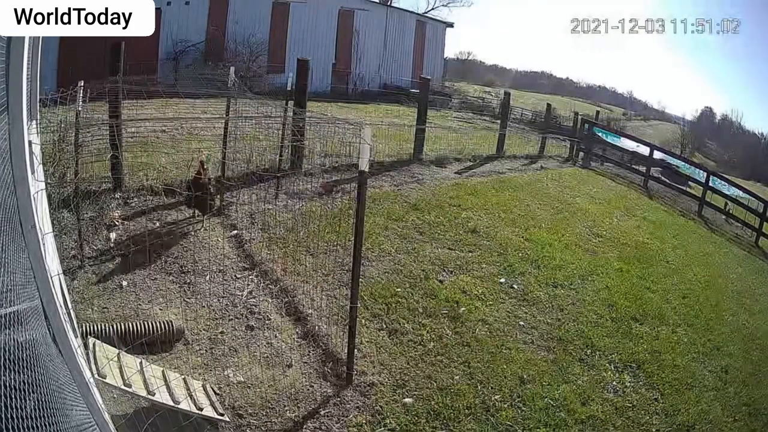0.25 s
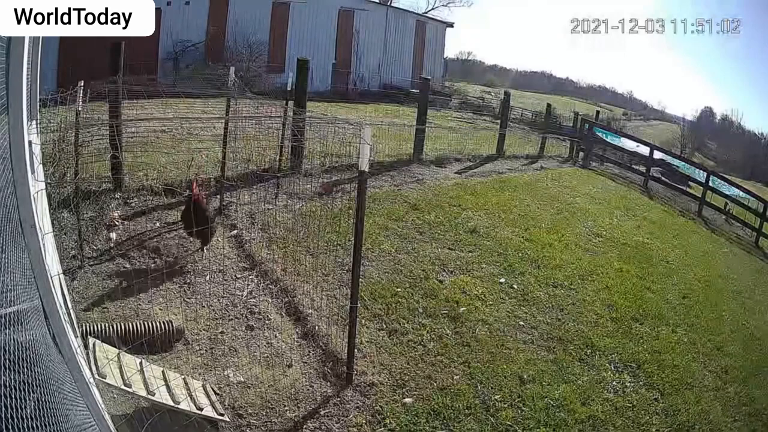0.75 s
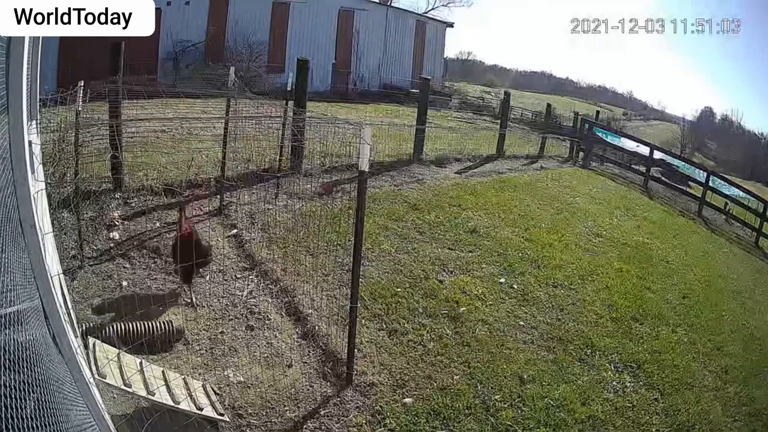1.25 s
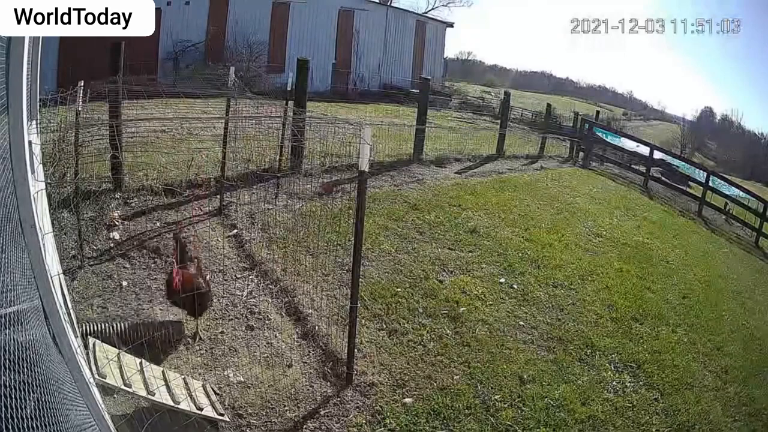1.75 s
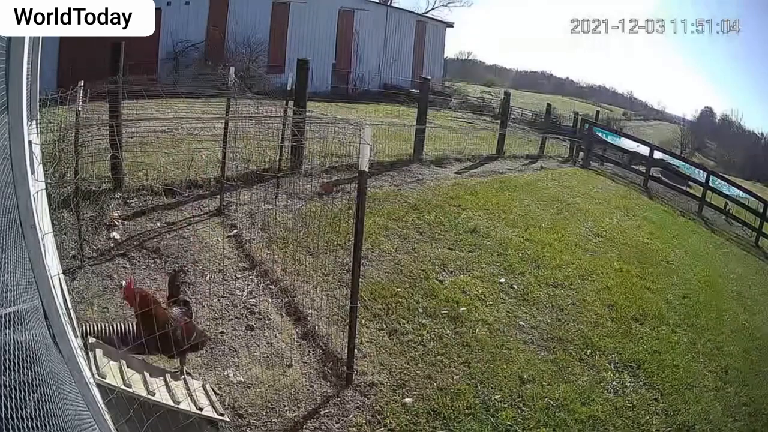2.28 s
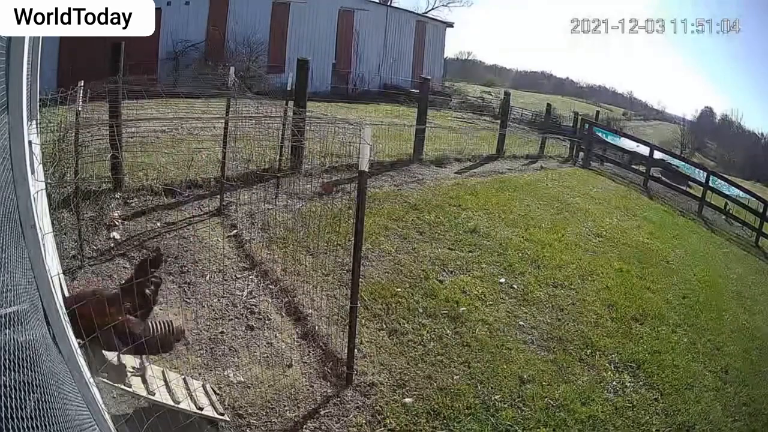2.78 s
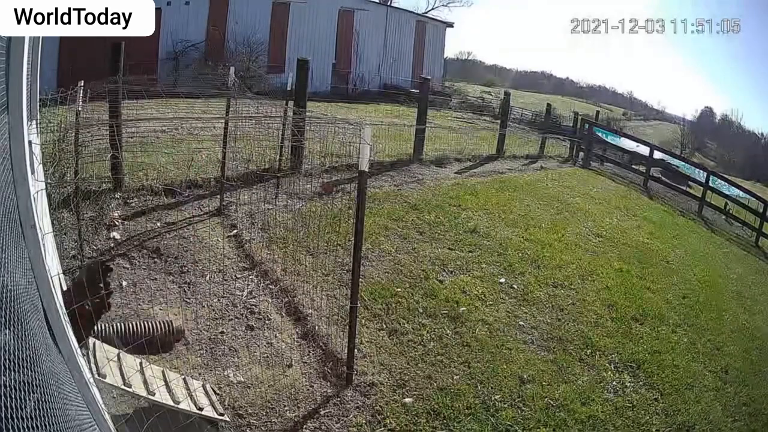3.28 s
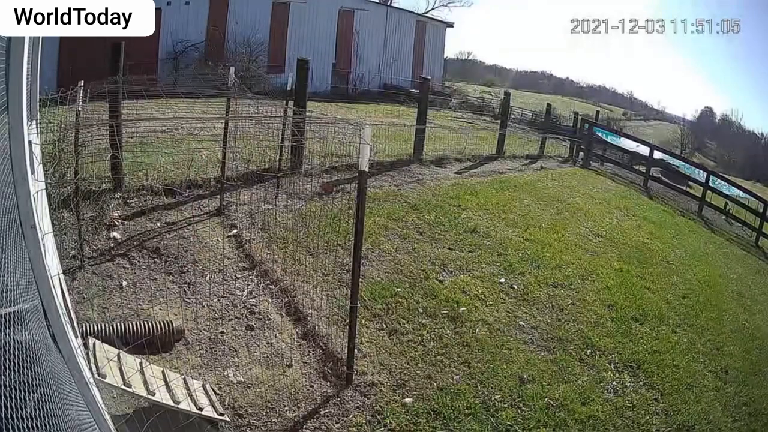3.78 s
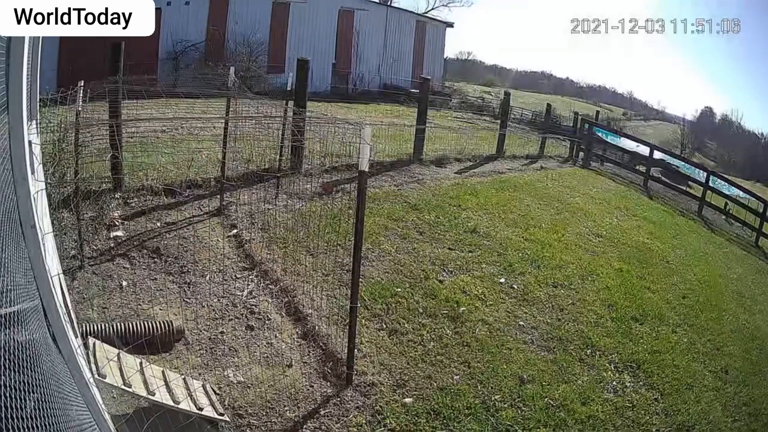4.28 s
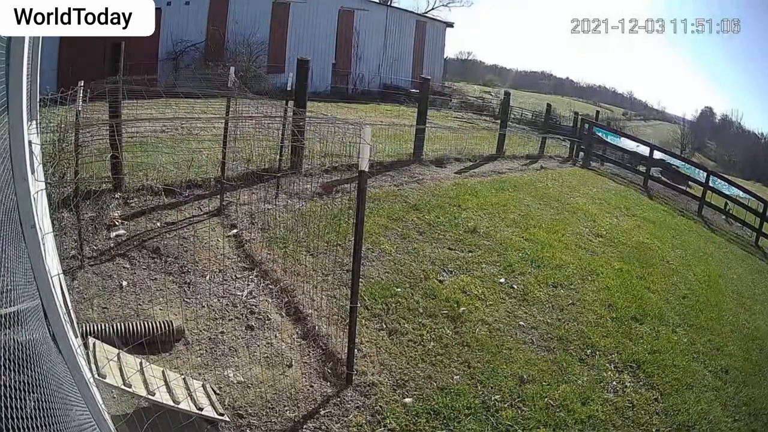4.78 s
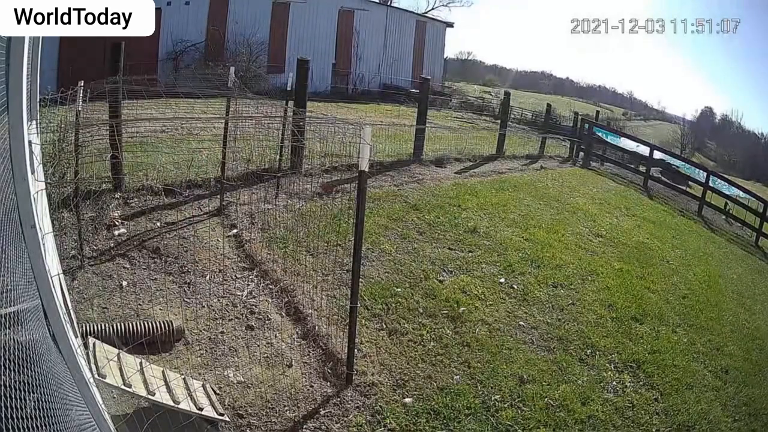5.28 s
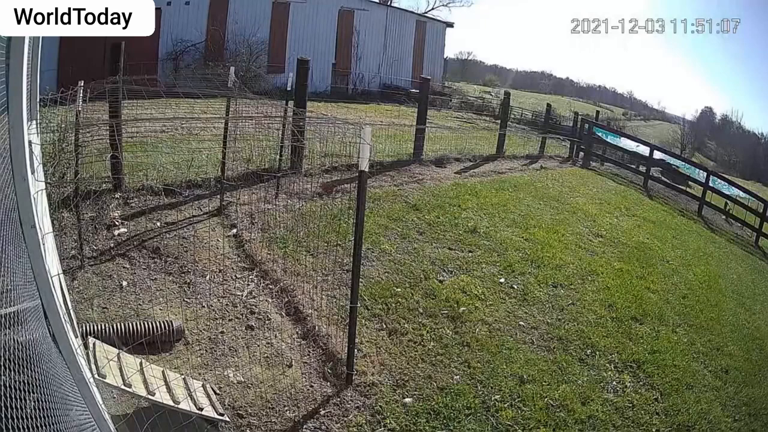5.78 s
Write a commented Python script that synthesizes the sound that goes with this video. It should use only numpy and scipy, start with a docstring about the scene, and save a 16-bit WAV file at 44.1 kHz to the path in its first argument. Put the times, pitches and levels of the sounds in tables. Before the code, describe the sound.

A small camera microphone on a chicken coop, outdoors, with slightly dull treble. Very quiet air and a faint low hum run throughout. A chicken gives abrupt, throaty alarm clucks, each about a twentieth of a second, at 0.4, 0.6 and 0.8 s, then harsher ones at 1.45, 1.7 and 1.9 s. Barely audible husky notes from other hens fall between. Around 2.3 s claws scrape briefly on the ramp, with soft low thumps until about 3.5 s. Clucks at 2.5 and 2.7 s lead into the loudest call: a rough squawk from 2.85 s, locking into a held, swelling note and stopping just before 3 s, with barn echoes. From inside the coop come a boxy cluck at 3.8 s, three weaker ones at 4.6, 4.8 and 5.1 s, and two muffled ones at 5.8 and 6.05 s. A thin peep sounds at 5.5 s; a far motor swells faintly near 5.1 and 5.9 s.

```python
"""A chicken gives sharp alarm clucks and one long squawk: membrane slaps (source) excite resonances (filter).
Others answer faintly with soft husky notes and one thin peep, a frequency-modulated tone.
Claws scrape up the ramp as decaying grainy noise, and thumps are decaying sines with the wall trembling.
Convolution with decaying noise gives the ring of the coop and the echoes of a barn across the yard.
Underneath lie a faint low hum of steady sines, a far motor, and filtered noise for the outdoor air."""
import sys
import numpy as np
from scipy import signal
from scipy.fft import rfft, irfft, next_fast_len
from scipy.io import wavfile
from scipy.ndimage import map_coordinates

SR = 44100
rng = np.random.default_rng(int(sys.argv[2]) if len(sys.argv) > 2 else 0)


def wav_out(sig):
    """Save sig, one row per channel (or a flat mono array), as 16-bit PCM at SR to the path in sys.argv[1]."""
    wavfile.write(sys.argv[1], SR, np.round(np.clip(np.atleast_2d(sig).T, -1, 1) * 32767).astype(np.int16))


N = 266795
TIME = np.arange(N) / SR

# loud clucks: middle t/s, length t/s, nominal pitch f/Hz, throat f/Hz, throat level/dB, clean share [0-1],
# beak f/Hz, beak width f/Hz, beak level/dB
ALARM_CLUCKS = [(0.358, 0.03642, 257, 742, -17.5, 0.7, 2560, 600, -25),
                (0.594, 0.0428, 275, 790, -15.5, 0.47, 2310, 800, -17),
                (0.832, 0.03302, 365, 717, -14, 0.7, 2186, 700, -22),
                (1.453, 0.04513, 308, 919.6, -14.5, 0.15, 2154, 480, -20.5),
                (1.669, 0.0512, 234, 680, -12.5, 0.51, 1956, 450, -18.5),
                (1.918, 0.04632, 288, 780, -15, 0, 2397, 200, -13.5),
                (2.52, 0.0438, 291, 982, -14.5, 0.02, 1990, 1200, -24),
                (2.734, 0.045, 269, 810, -11, .7, 1874, 590, -20.5),
                (3.812, 0.05375, 362, 733, -15.5, 0.44, 2433, 600, -26),
                (4.599, 0.0436, 260, 797, -21, 0.18, 1980, 170, -27),
                (4.821, 0.05435, 274, 790, -19.5, 0.05, 2095, 820, -23),
                (5.098, 0.0404, 260, 760, -19, 0.34, 1852, 240, -31),
                (5.805, 0.0501, 255, 757, -22, 0.65, 2357, 780, -36.5),
                (6.046, 0.0287, 264, 771, -19.5, 0.75, 2180, 850, -36)]
# windpipe resonances: centre f/Hz, width before sharpening f/Hz, level/dB
WINDPIPE_RESONANCES = [(2825.8, 280, -9), (3524, 320, -3.5), (4597, 390, -11.5), (5248, 200, -8),
                       (5836, 140, -7), (6385.4, 220, -6.5), (6871.4, 140, -6)]
CLUCK_ROUGH = .36  # scatter of the membrane slaps, 0-1
THROAT_WIDTH_HZ, CLEAN_NARROWS = 290, .95  # a clean cluck narrows the throat resonance by up to this share
CHEST_DB, COOP_BOOM_DB, GULLET_DB = -14.5, -9, -7.5  # weaker resonances beside the main one of the throat
OPEN_SHARE, OPEN_LEAD_S = 0.652, 0.0031  # the beak is open for this share of a cluck, just ahead of its middle
WHISTLE_WIDTH_HZ, BEAK_SLIDE = 200, 0.13  # narrower beak resonances whistle; relative fall as the beak closes
RASP_DB, RASP_GROWS = -7.5, 0.6743  # rasp level at a beak level of 0 dB, and dB per dB of beak level
MUFFLE_DB, SHIELD_DB = -9, -3.5  # inside: rasp lost at the microphone, throat lost towards the yard


def clucks():
    """Source-filter principle: a throat tone turns harsh as the beak opens, and its resonances sink."""
    near, away = np.zeros(N), np.zeros(N)  # towards the microphone, towards the yard
    t = np.arange(-SR // 12, SR // 12) / SR
    for s, length, pitch, hz, db, clean, beak_hz, beak_width, beak_db in ALARM_CLUCKS:
        width = THROAT_WIDTH_HZ * (1 - CLEAN_NARROWS * clean)
        open_for = OPEN_SHARE * length
        closing = np.clip(.5 + t / length, 0, 1)
        contour = pitch * (1.02 + .1 * closing - .2 * closing ** 2)
        voice = syrinx(contour, CLUCK_ROUGH, jitter=.11, breath=.35, uneven=.1)
        effort = swell(t, 0, length, steep=4.2)
        opening = voice * swell(t, -OPEN_LEAD_S, open_for, steep=3.2)

        def throat(f, stage):
            main = peak(f, hz * (1.04 - 0.12 * stage), width)
            chest = amp(CHEST_DB) * (1 - clean) * peak(f, 380, 80)
            boom = amp(COOP_BOOM_DB) * inside(s) * peak(f, 385, 50)
            gullet = amp(GULLET_DB) * peak(f, 1095, 73)
            passed = band(f, 470, 1100, order=4)
            return (main + chest + boom + gullet) * passed * ripple(f, depth_db=2.88, spacing_hz=170)

        def mouth(f, stage):
            main = peak(f, beak_hz * (1 + BEAK_SLIDE * (.5 - stage)), beak_width)
            fixed = 0.09 * peak(f, 3200, 200) + amp(-21.5) * peak(f, 2100, 200)
            return (main + fixed) * band(f, 1500, 3000, order=4) * ripple(f, depth_db=6, spacing_hz=170)

        def pipe(f, stage):
            resonances = sum(amp(g) * peak(f, c, w) ** 1.415 for c, w, g in WINDPIPE_RESONANCES)
            return resonances * ripple(f, depth_db=6, spacing_hz=170)

        buzz = shifting(voice * effort, closing, throat, count=2)
        beak = shifting(opening, closing, mouth, count=2)
        rasp = shifting(opening, closing, pipe, count=2)
        # part of the energy locks onto the throat resonance as a wavering tone
        glide = hz * (1.06 - 0.13 * closing + .045 * wobble(220, len(t)))
        tone = np.sin(2 * np.pi * np.cumsum(glide) / SR) * effort * amp(1.5 * wobble(130, len(t)))
        tone = tone * (1 - swell(t, -OPEN_LEAD_S, open_for, steep=3.3) / 2)  # weakens at the hardest push
        body = np.sqrt(clean) * unit(tone) + np.sqrt(1 - clean) * unit(buzz)
        # a narrow beak resonance sings out as a falling whistle
        slide = beak_hz * (1 + BEAK_SLIDE * (.5 - closing) + .015 * wobble(250, len(t)))
        whistle = np.sin(2 * np.pi * np.cumsum(slide) / SR) * effort * amp(3 * wobble(150, len(t)))
        beak = unit(beak) + 2 * np.exp(-beak_width / WHISTLE_WIDTH_HZ) * unit(whistle)
        body = burst(body, db, length)
        beak = burst(beak, beak_db, open_for)
        rasp = burst(rasp, RASP_DB + RASP_GROWS * beak_db, open_for)
        # inside, the rasp beams out of the door past the microphone
        add(near, s + t[0], body + beak + amp(MUFFLE_DB * inside(s)) * rasp)
        shield = SHIELD_DB * inside(s)
        add(away, s + t[0], amp(shield) * body + amp(shield / 2) * beak + rasp)
    return near, away


# throat response in the squawk: f/Hz, level/dB
SQUAWK_RESPONSE = [(200, -22.5), (320, -19), (480, -14), (630, -0.5), (900, 0), (1250, -7.5), (1800, -9.5),
                   (2500, -16.5), (3100, -12), (4100, -22.5), (5300, -18.5), (7000, -26), (8000, -53.5)]
# short dull returns of the squawk just after it ends: middle t/s, length t/s, level/dB
LATE_RETURNS = [(2.993, 0.0081, -10), (3.029, .022, -25.5)]
SQUAWK_START_S, SQUAWK_END_S = 2.843, 2.976  # the held note
SQUAWK_DB, SQUAWK_RISE_DB_PER_S = -8, 31.5  # it swells to this level at its end
SQUAWK_ATTACK_S, SQUAWK_RELEASE_S = 0.015, .012
SQUAWK_HZ, SCOOP_HZ = 622.5, 42  # pitch, and how far below it the note starts
LOCK_S, HELD_ROUGH, LOOSE_ROUGH = .03, .07, .85  # time to lock, roughness 0-1 once locked, extra while loose
DULLING_DB_PER_S = 519  # the overtones drain away once the push stops


def squawk():
    """Period doubling: a rough start scoops up and locks into a held note, then ends in short dull returns."""
    out, t = np.zeros(N), np.arange(SR // 4) / SR
    hold = SQUAWK_END_S - SQUAWK_START_S
    after = np.maximum(t - hold, 0)
    push = amp(SQUAWK_DB - SQUAWK_RISE_DB_PER_S * np.maximum(hold - t, 0))
    push = push * (1 - np.exp(-(t / SQUAWK_ATTACK_S) ** 3)) * np.exp(-after / SQUAWK_RELEASE_S)
    for s, length, db in LATE_RETURNS:
        push = push + amp(db) * swell(SQUAWK_START_S + t, s, length, steep=2.7)
    loose = np.exp(-(t / LOCK_S) ** 2)
    breaking = swell(t, hold + SQUAWK_RELEASE_S, SQUAWK_RELEASE_S, steep=2)
    pitch = (SQUAWK_HZ - SCOOP_HZ * loose) * (1 + .005 * wobble(80, len(t)))
    rough = HELD_ROUGH + LOOSE_ROUGH * (loose + breaking / 2)
    voice = syrinx(pitch, rough, jitter=.15, breath=1.5, uneven=.4)
    note = unit(coloured(voice, lambda f: amp(along(SQUAWK_RESPONSE, f))))
    low = signal.sosfiltfilt(signal.butter(2, 1500, fs=SR, output="sos"), note)

    # the overtones swell and fade one by one as the head moves
    def head(f, stage):
        return ripple(f, depth_db=5, spacing_hz=260)

    high = shifting(note - low, np.linspace(0, 1, len(t)), head, count=8)
    add(out, SQUAWK_START_S, push * (low + amp(-0.5 - DULLING_DB_PER_S * after) * high))
    return out


# soft notes of the flock: middle t/s, length t/s, throat f/Hz, level/dB
SOFT_NOTES = [(.097, 0.0243, 1022, -55), (1.121, .021, 1066, -50.5), (1.283, 0.0336, 1033, -59.5),
              (2.124, 0.0405, 1000, -45), (2.256, 0.061, 788.1, -36.5), (3.571, .058, 953, -59.5),
              (4.002, 0.012, 734, -46), (4.192, 0.039, 644, -60), (4.441, 0.041, 1166, -61.5),
              (5.283, 0.042, 826, -56)]
MURMUR_HZ, MURMUR_SAG_OCT_PER_S, MURMUR_ROUGH = 355, 4.3, 0.19  # usual pitch, its fall, roughness 0-1


def murmurs():
    """Harmonic-formant tuning: husky notes, beak nearly shut, place an overtone on the throat resonance."""
    out, t = np.zeros(N), np.arange(-SR // 10, SR // 10) / SR
    for s, length, hz, db in SOFT_NOTES:
        pitch = hz / round(hz / MURMUR_HZ) * 2 ** (-MURMUR_SAG_OCT_PER_S * t)
        voice = syrinx(pitch, MURMUR_ROUGH, jitter=.25, breath=3, uneven=0)

        def throat(f):
            low = peak(f, hz, 120) ** 2 + 0.5 * peak(f, 400, 120) ** 2
            return low + 0.013 * peak(f, 2300, 300) ** 2 + 0.021 * peak(f, 4000, 300) ** 2

        note = coloured(voice * swell(t, 0, length, steep=3), throat)
        add(out, s + t[0], burst(note, db, length))
    return out


PEEP_S, PEEP_LENGTH_S, PEEP_HZ, PEEP_DB = 5.537, 0.0214, 1087.2, -45  # one thin, rising peep
PEEP_RISE_OCT_PER_S, PEEP_OVERTONE_DB = 1.5, -20


def peep():
    """Frequency modulation: a nearly pure rising whistle with a faint fourth harmonic."""
    out, t = np.zeros(N), np.arange(-SR // 20, SR // 20) / SR
    pitch = PEEP_HZ * 2 ** (PEEP_RISE_OCT_PER_S * t) * (1 + 0.01066 * wobble(200, len(t)))
    phase = 2 * np.pi * np.cumsum(pitch) / SR
    tone = np.sin(phase) + amp(PEEP_OVERTONE_DB) * np.sin(4 * phase)
    shaped = tone * swell(t, 0, PEEP_LENGTH_S, steep=3.16)
    add(out, PEEP_S + t[0], burst(shaped, PEEP_DB, PEEP_LENGTH_S))
    return out


# claws on the ramp: onset t/s, level/dB
CLAW_SCRAPES = [(2.329, -45.5), (2.336, -22.5), (2.359, -43), (2.369, -24), (2.435, -40), (3.28, -48.5)]
# feet and wings against the coop: onset t/s, level/dB, pitch f/Hz
BOARD_THUMPS = [(1.775, -42, 34.94), (2.375, -25, 40.29), (2.544, -26.5, 65.61), (2.594, -39, 87.97),
                (2.749, -25.5, 83.24), (2.756, -31, 150.9), (2.847, -44.5, 103.6), (3.103, -48, 88.79),
                (3.296, -36, 345.5), (3.377, -40, 116.1), (3.452, -39, 46.64)]
CLAW_HZ, CLAW_DECAY_S, THUMP_DECAY_S = 3240, .036, 0.13  # decays are times to fall 60 dB
RAMP_MIDDLE_S, RAMP_LENGTH_S, RAMP_DB = 2.95, 1.3, -55  # the coop wall trembles while the bird climbs


def feet():
    """Impact excitation: claws rasp in grainy scrapes, steps thud as damped modes and the wall trembles."""
    out, t = np.zeros(N), np.arange(SR // 4) / SR

    def claw(f):
        return (peak(f, CLAW_HZ, 1100) + 0.46 * peak(f, 5000, 1100)) * band(f, 1450, 7000, order=4)

    for s, db in CLAW_SCRAPES:
        grains = rng.standard_normal(len(t)) * amp(3.5 * wobble(900, len(t)))
        scrape = unit(coloured(grains, claw))
        add(out, s, amp(db - 60 * t / CLAW_DECAY_S) * (1 - np.exp(-t / 0.0008)) * scrape)
    for s, db, hz in BOARD_THUMPS:
        knock = coloured(rng.standard_normal(len(t)), lambda f: band(f, hz / 2, hz * 4.5, order=3))
        thud = np.sin(2 * np.pi * hz * t) + 0.13 * unit(knock)
        add(out, s, amp(db - 60 * t / THUMP_DECAY_S) * (1 - np.exp(-t / 0.0011)) * thud)
    tremble = rush(lambda f: band(f, 15, 74, order=2))
    return out + amp(RAMP_DB) * swell(TIME, RAMP_MIDDLE_S, RAMP_LENGTH_S, steep=6) * tremble


ENTER_S, ENTERED_S = 2.243, 3.8  # the bird passes through the coop door


def inside(s):
    """Linear transition: how far the bird is inside the coop at time s, 0-1."""
    return np.clip((s - ENTER_S) / (ENTERED_S - ENTER_S), 0, 1)


def coop(x):
    """Early scattering: boards blur sound for under 0.1 s, with a freshly drawn pattern every quarter second."""
    out, t, block = np.zeros(N), np.arange(SR // 12) / SR, SR // 4
    for k in range(N // block + 1):
        walls = rng.standard_normal(len(t)) * amp(-60 * t / 0.095) * (t > .002)
        add(out, k / 4, signal.fftconvolve(x[k * block:][:block], walls / np.linalg.norm(walls)))
    return out


# decay of the diffuse tail: f/Hz, t60 t/s
YARD_DECAY = [(200, 0.3), (800, .7), (1400, .5), (2300, .8), (4000, .5), (7000, 0.31)]
# sheds and barn: delay t/s, level before wall colour/dB
BUILDING_ECHOES = [(.082, -21), (.125, -32), (.2, -33), (.316, -35), (.46, -49)]
# what the buildings send back: f/Hz, level/dB
WALL_REFLECTION = [(300, -24), (600, -13.5), (800, -10), (1240, -1), (1700, -8.5), (2250, 1), (3000, -10.5),
                   (4500, -12), (7000, -14)]
ECHO_DECAY_S = 0.12  # t60 of each echo from the ribbed walls


def yard(x):
    """Impulse-response convolution: a faint diffuse tail, with echoes that ribbed walls colour strongly."""
    hz, t, z = signal.stft(rng.standard_normal(SR), SR, nperseg=256)
    tail = signal.istft(z * amp(-60 * t / along(YARD_DECAY, hz)[:, None]), SR, nperseg=256)[1]
    answer = amp(-34.0) * tail / np.linalg.norm(tail)
    t = np.arange(SR // 4) / SR

    def ribbed(f):
        return amp(along(WALL_REFLECTION, f)) * ripple(f, depth_db=4.5, spacing_hz=190)

    for delay, db in BUILDING_ECHOES:
        blur = rng.standard_normal(len(t)) * amp(-60 * t / ECHO_DECAY_S)
        add(answer, delay, amp(db) * coloured(blur / np.linalg.norm(blur), ribbed))
    return signal.fftconvolve(x, answer)[:N]


# steady hum partials: f/Hz, rms level/dB
HUM_PARTIALS = [(64.6, -56), (193.8, -78.5), (258.4, -82.5), (290.7, -74), (323.0, -74.5)]
# the far motor carries over twice: middle t/s, length t/s, level/dB
MOTOR_SWELLS = [(5.128, 0.29, -54.5), (5.934, 0.242, -54)]
# relative spectrum of the outdoor air: f/Hz, level per Hz/dB
AIR_SPECTRUM = [(12, -59), (20, -13.5), (55, 3), (164, -21.5), (292, -17.5), (448, -31), (575, -23.5),
                (797, -27.5), (1050, -27.5), (1530, -38), (6380, -49), (8000, -65), (10400, -96.5),
                (17600, -120)]
DRONE_HZ, DRONE_DB = 130.2, -73  # the far motor between its swells
RUMBLE_DB, RUMBLE_SWING_DB = -62, 2.5  # air on the microphone


def background():
    """Additive and subtractive synthesis: a steady low hum, a far motor, and slowly stirring outdoor air."""
    hum = np.zeros(N)
    for hz, db in HUM_PARTIALS:
        phase = 2 * np.pi * (hz * TIME + rng.random()) + 0.22 * wobble(22, N)
        hum += np.sqrt(2) * amp(db) * np.sin(phase)
    carry = amp(DRONE_DB) + sum(amp(db) * swell(TIME, s, length, steep=1.5) for s, length, db in MOTOR_SWELLS)
    motor = np.sqrt(2) * np.sin(2 * np.pi * DRONE_HZ * TIME + .5 * wobble(11, N))
    drone = carry * amp(1.3 * wobble(3.1, N)) * motor
    air = rush(lambda f: amp(along(AIR_SPECTRUM, f)) * band(f, 53, 9000, order=2))
    air = amp(-59.5 + 3.4 * wobble(3.3, N)) * air
    rumble = rush(lambda f: band(f, 12, 43, order=2))
    rumble = amp(RUMBLE_DB + RUMBLE_SWING_DB * wobble(5.9, N)) * rumble
    return hum + drone + air + rumble


def syrinx(pitch, rough, jitter, breath, uneven):
    """Pulse-train source: roughness scatters membrane slaps in time and size and adds air, puffed each cycle."""
    size = len(pitch)
    rough = np.clip(rough + np.zeros(size), 0, 1)
    air = rng.standard_normal(size)
    cycles = np.cumsum(pitch) / SR + rng.random()
    late, strong = rng.standard_normal((2, 400))
    k = np.arange(1, int(cycles[-1]))
    scatter = np.interp(k, cycles, rough)
    at = np.interp(k + jitter * late[k] * scatter, cycles, np.arange(size))
    force = np.exp(.5 * strong[k] * scatter) * (1 + uneven * (-1.) ** k)  # slaps alternate in strength
    # a sinc spread over 16 samples places each slap between samples
    taps = at.astype(int)[:, None] + np.arange(-7, 9)
    weights = force[:, None] * np.sinc(taps - at[:, None])
    slaps = np.bincount(np.clip(taps, 0, size - 1).ravel(), weights.ravel(), size)
    puffs = unit(air * (1 + np.cos(2 * np.pi * cycles)) ** 2)
    return unit(slaps) + breath * rough * puffs


def ripple(f, depth_db, spacing_hz):
    """Comb-like interference: random peaks and notches from nearby surfaces, new at each call."""
    knots = rng.standard_normal(int(SR / spacing_hz) + 4)
    return amp(depth_db * map_coordinates(knots, [f / spacing_hz]))


def shifting(x, progress, gain, count):
    """Time-varying filtering: crossfade through gain(f, stage) as progress runs from 0 to 1."""
    out = 0
    for stage in np.linspace(0, 1, count):
        share = np.clip(1 - np.abs(progress - stage) * (count - 1), 0, 1)
        out = out + coloured(x * share, lambda f: gain(f, stage))
    return out


def coloured(x, gain):
    """Minimum-phase filtering: a folded cepstrum makes the causal filter with the given gain of frequency."""
    m = 2 * next_fast_len(len(x) // 2 + 2048)
    cepstrum = irfft(np.log(np.maximum(gain(np.fft.rfftfreq(m, 1 / SR)), 1e-6)))
    cepstrum[1:m // 2] *= 2
    cepstrum[m // 2 + 1:] = 0
    return irfft(rfft(x, m) * np.exp(rfft(cepstrum)), m)[:len(x)]


def rush(gain):
    """Spectral shaping: steady noise of rms 1 with the given gain of frequency."""
    m = next_fast_len(N, real=True)
    return unit(irfft(rfft(rng.standard_normal(m)) * gain(np.fft.rfftfreq(m, 1 / SR)), m)[:N])


def peak(f, hz, width):
    """Simple resonance: gain of one damped mode."""
    return f * width / np.hypot(hz * hz - f * f, f * width)


def band(f, low_hz, high_hz, order):
    """Butterworth response: gain of a band-pass."""
    return ((1 + (low_hz / (f + 1)) ** (2 * order)) * (1 + (f / high_hz) ** (2 * order))) ** -.5


def swell(t, middle, length, steep):
    """Generalised Gaussian envelope: a rounded burst."""
    return np.exp(-np.abs(2 * (t - middle) / length) ** steep / 2)


def wobble(rate, size):
    """Band-limited fluctuation: a smooth random curve, rate knots a second."""
    count = int(size * rate / SR) + 4
    fine = np.linspace(0, count - 1, 10 * count)
    curve = map_coordinates(rng.standard_normal(count), [fine])
    return np.interp(np.arange(size) * rate / SR, fine, curve)


def amp(db):
    """Logarithmic level: decibels to gain."""
    return 10 ** (np.asarray(db) / 20)


def unit(x):
    """Root-mean-square normalisation: scale to rms 1."""
    return x / np.sqrt(np.mean(x ** 2) + 1e-20)


def burst(x, db, length):
    """Energy equivalence: x with the energy of a sound at rms level db lasting length."""
    return amp(db) * x / np.sqrt(np.sum(x ** 2) / (SR * length) + 1e-20)


def along(points, hz):
    """Logarithmic interpolation: (f/Hz, value) points on a log axis."""
    f, v = np.transpose(points)
    return np.interp(np.log(hz + 1), np.log(f + 1), v)


def add(out, s, x):
    """Superposition: mix x into out from time s."""
    start = max(round(s * SR), 0)
    out[start:start + len(x)] += x[:max(len(out) - start, 0)]


COOP_OUTSIDE_DB, COOP_INSIDE_DB = -12, -4.5  # share of the sound that rings in the coop
CLUCK_ECHO_DB, SQUAWK_ECHO_DB = -3, 6.5  # sent towards the yard
SQUAWK_BEAM_HZ = 1000  # lower edge of the band that the squawk throws across the yard


def scene():
    """Superposition of direct and reflected sound: birds by the coop, their echoes, and the background."""
    calls, calls_away = clucks()
    cry = squawk()
    small = murmurs() + peep() + feet()
    near = calls + cry + small
    # the wide-open beak throws mainly the squawk's overtones across the yard
    beam_filter = signal.butter(2, [SQUAWK_BEAM_HZ, 5500], "bandpass", fs=SR, output="sos")
    beam = signal.sosfilt(beam_filter, cry)
    away = amp(CLUCK_ECHO_DB) * calls_away + amp(SQUAWK_ECHO_DB) * beam + small
    wet = amp(COOP_OUTSIDE_DB + (COOP_INSIDE_DB - COOP_OUTSIDE_DB) * inside(TIME))
    near = np.sqrt(1 - wet ** 2) * near + coop(wet * near)
    return (near + yard(away) + background())[None]


TOP_HZ = 7300  # upper edge of the camera's band


def record(dry):
    """Soft saturation and band limiting: the camera rounds off the highest peaks and cuts the treble."""
    held = dry[0] / (1 + np.abs(dry[0] / .66) ** 4) ** (1 / 4)
    m = next_fast_len(N + SR // 2)
    passed = band(np.fft.rfftfreq(m, 1 / SR), 12, TOP_HZ, order=60)
    return irfft(rfft(held, m) * passed, m)[None, :N]


dry = scene()
out = record(dry)
wav_out(out)
```